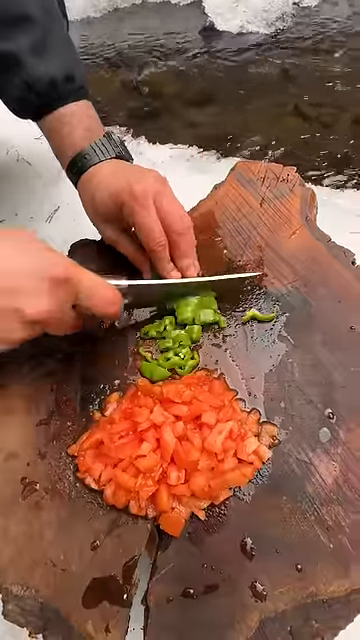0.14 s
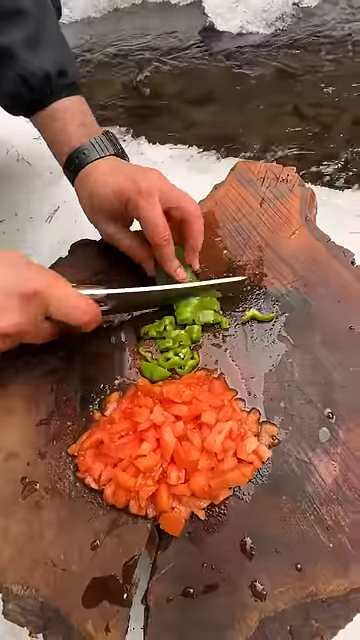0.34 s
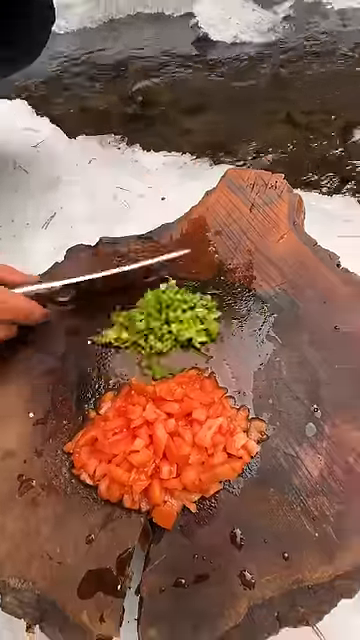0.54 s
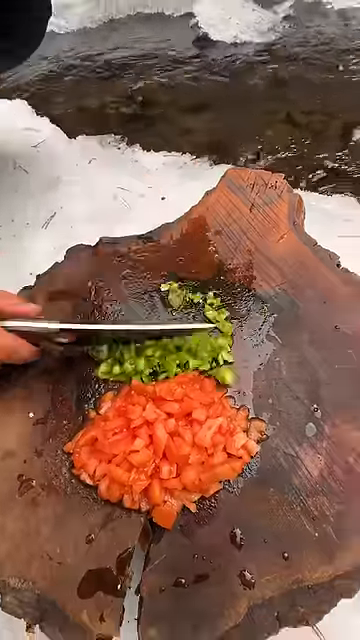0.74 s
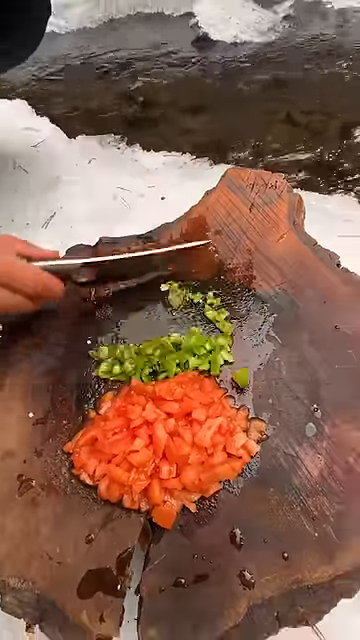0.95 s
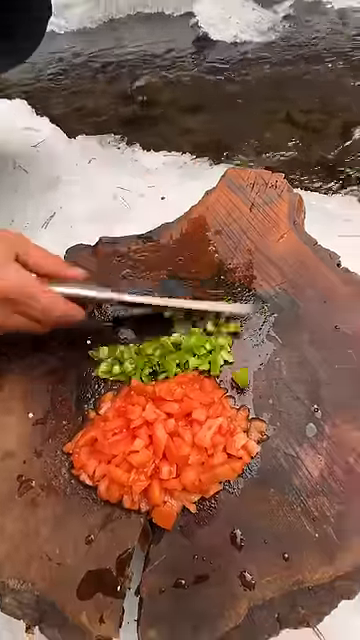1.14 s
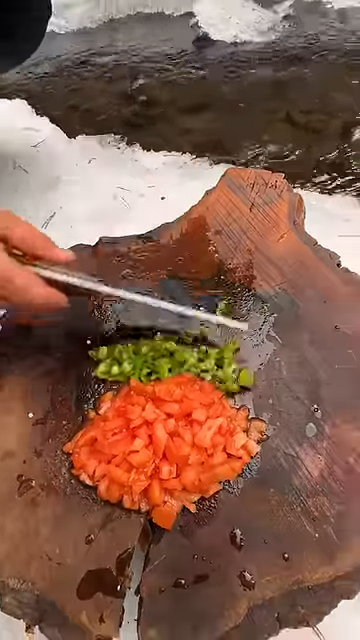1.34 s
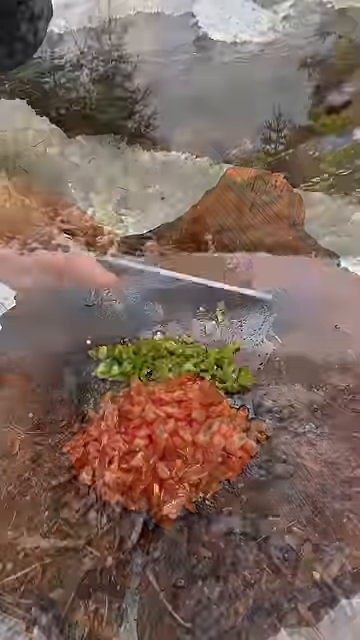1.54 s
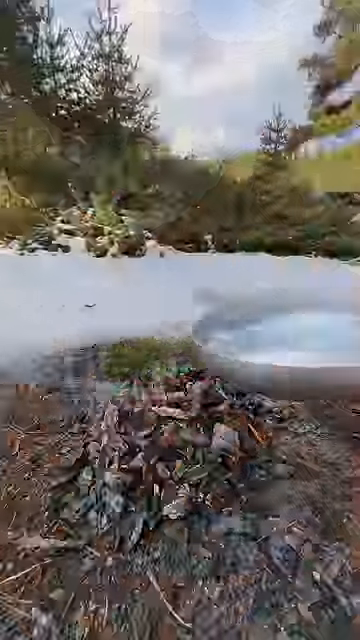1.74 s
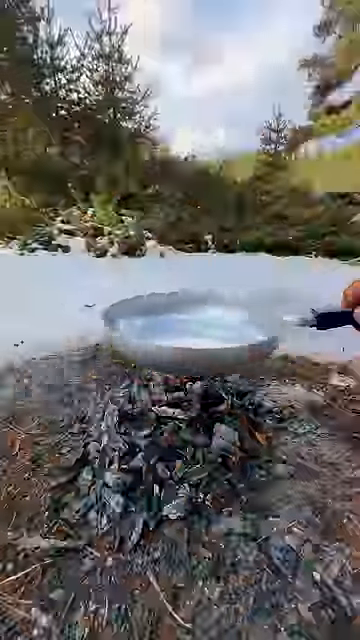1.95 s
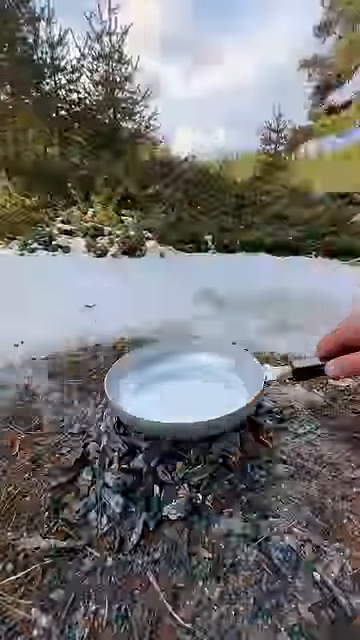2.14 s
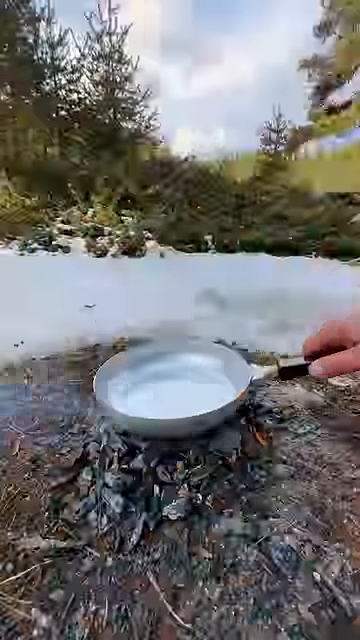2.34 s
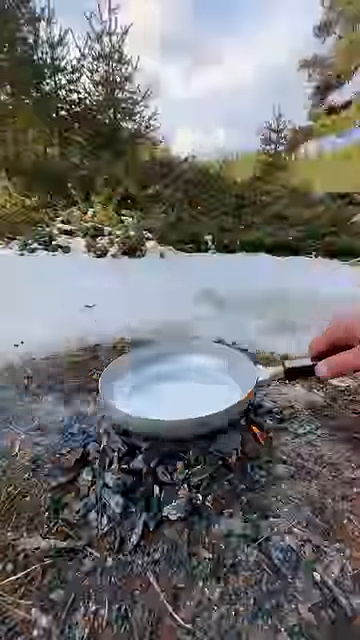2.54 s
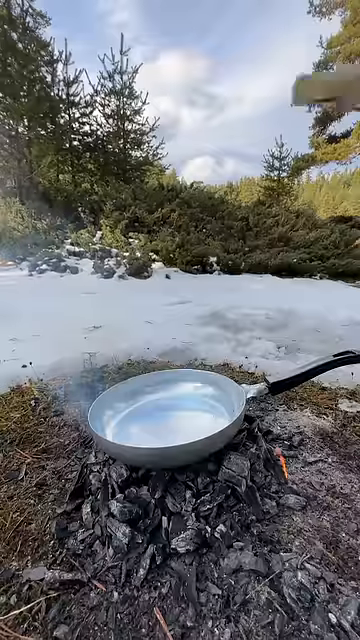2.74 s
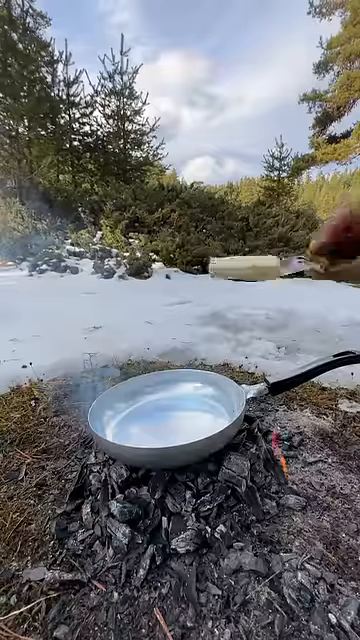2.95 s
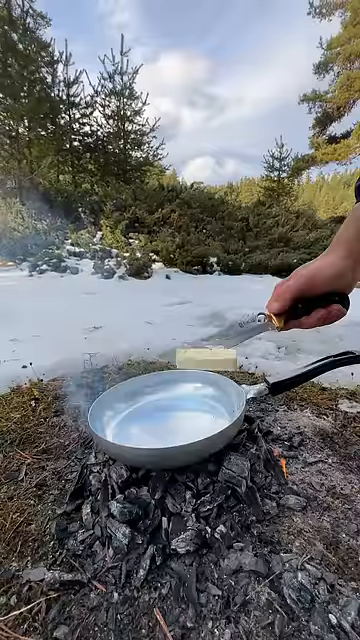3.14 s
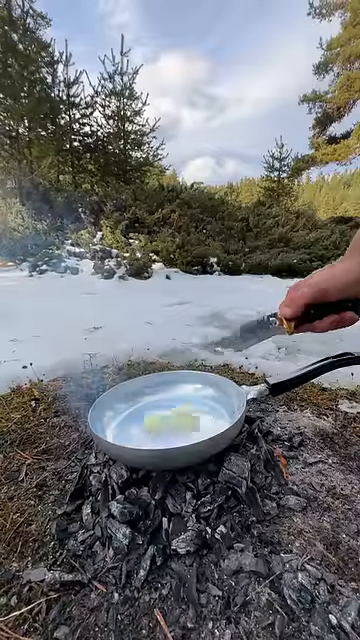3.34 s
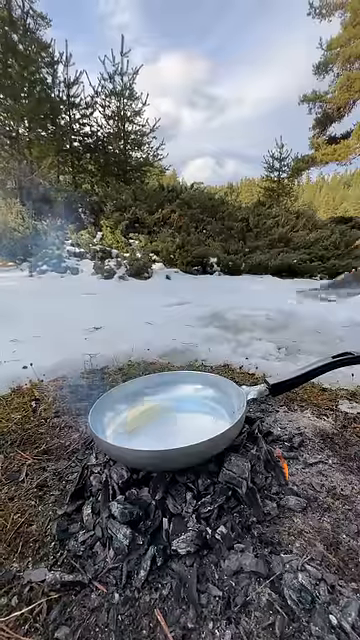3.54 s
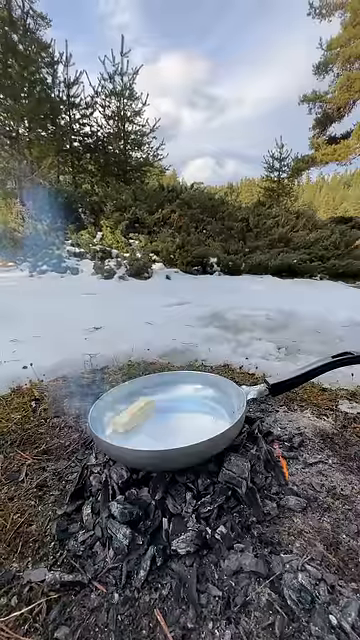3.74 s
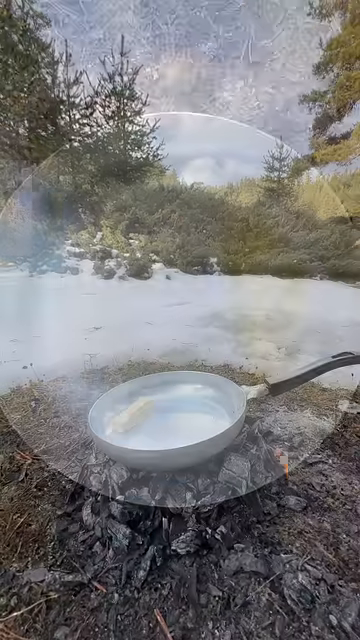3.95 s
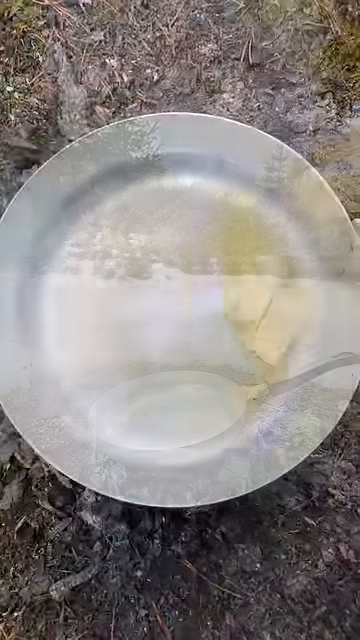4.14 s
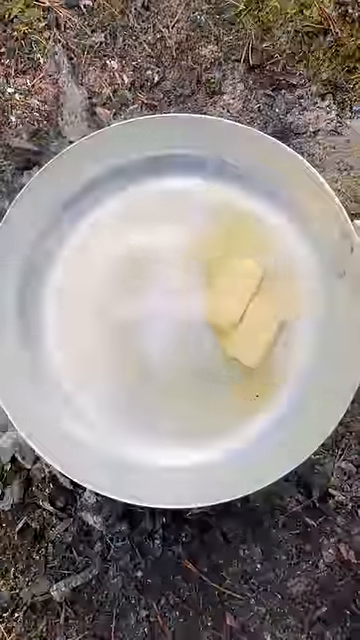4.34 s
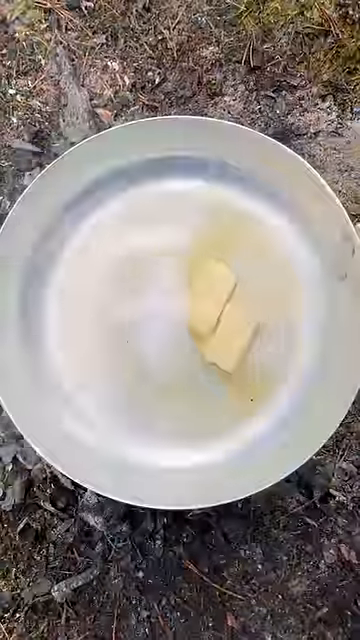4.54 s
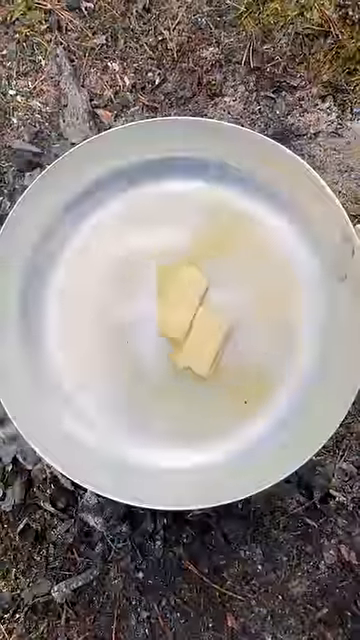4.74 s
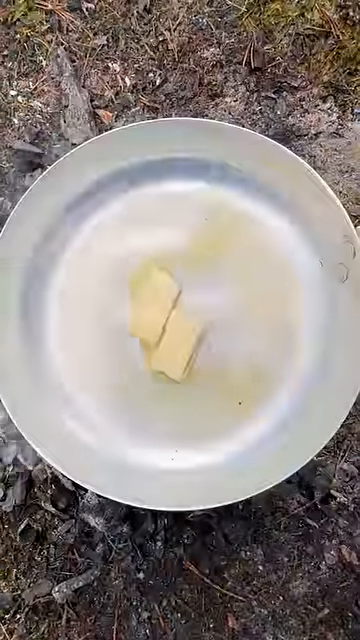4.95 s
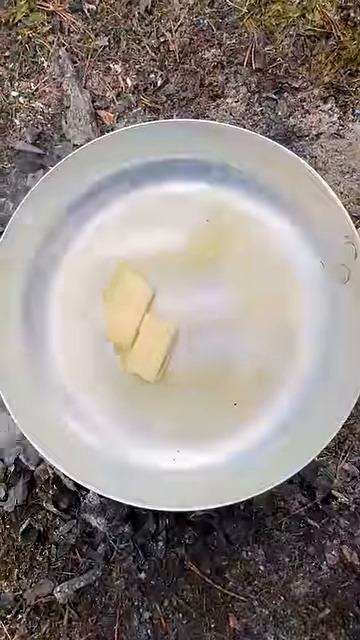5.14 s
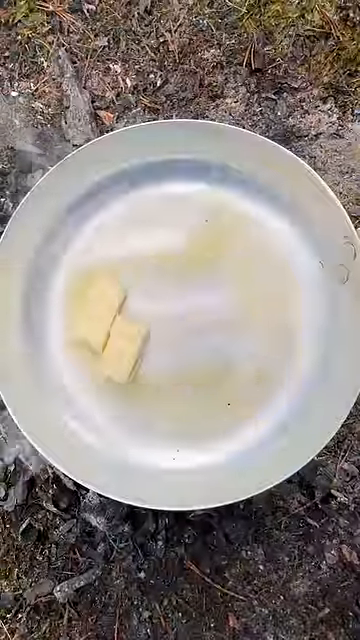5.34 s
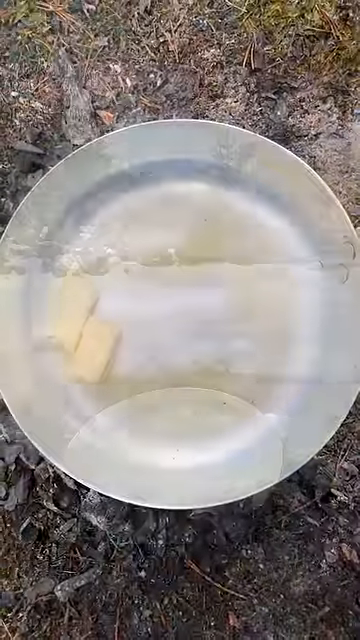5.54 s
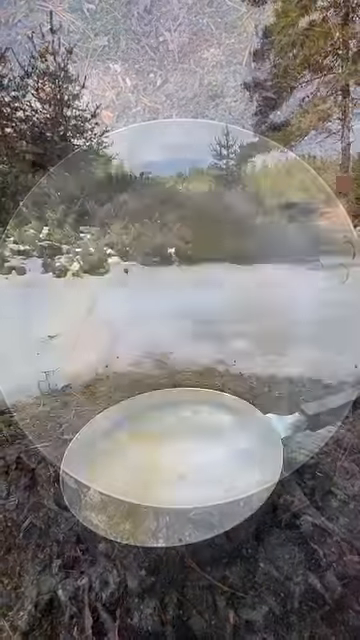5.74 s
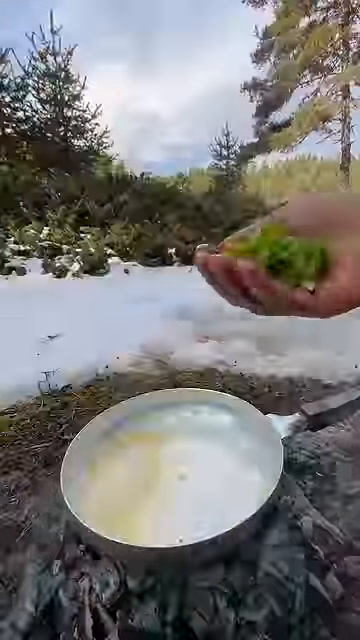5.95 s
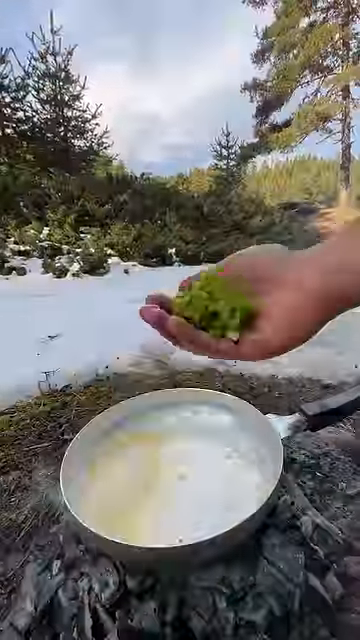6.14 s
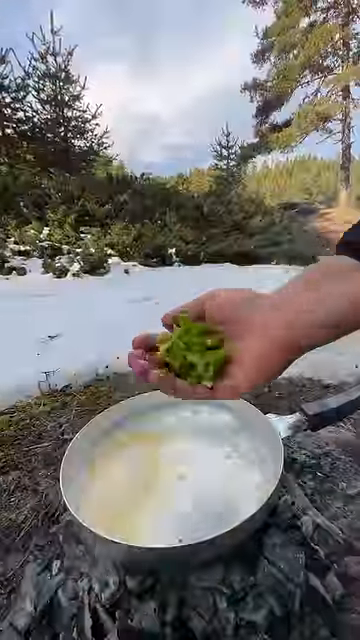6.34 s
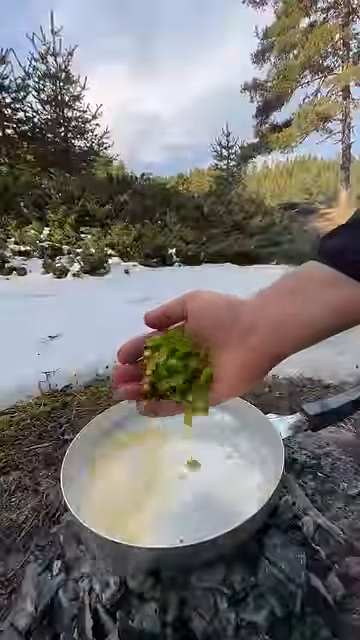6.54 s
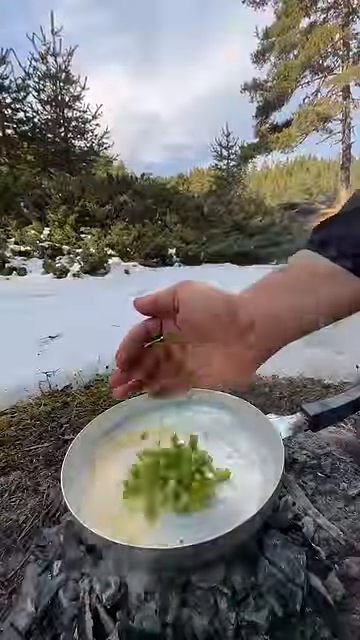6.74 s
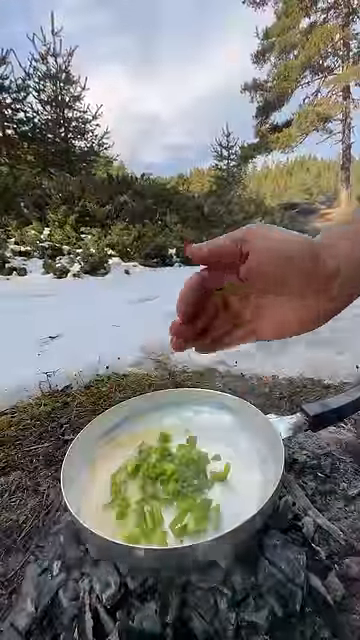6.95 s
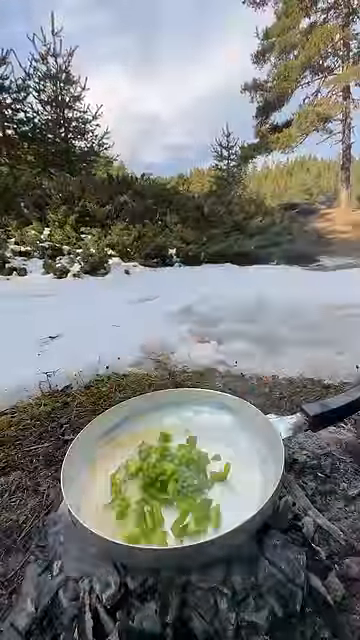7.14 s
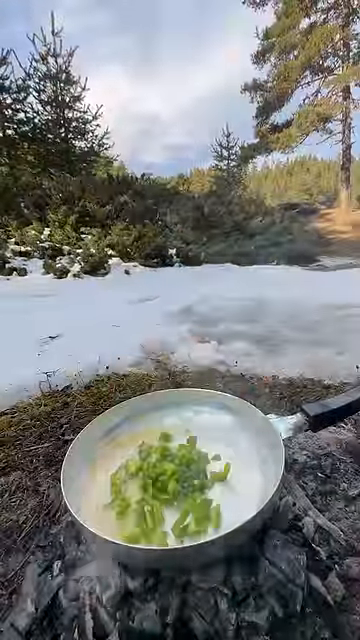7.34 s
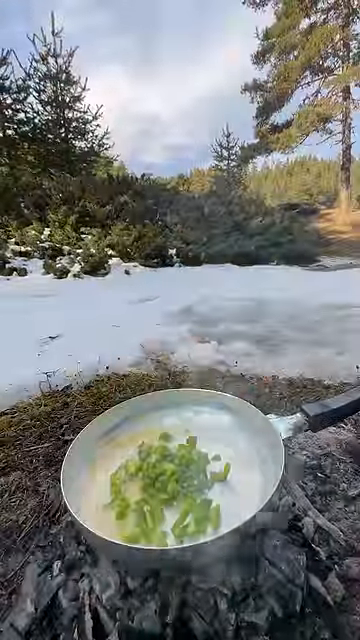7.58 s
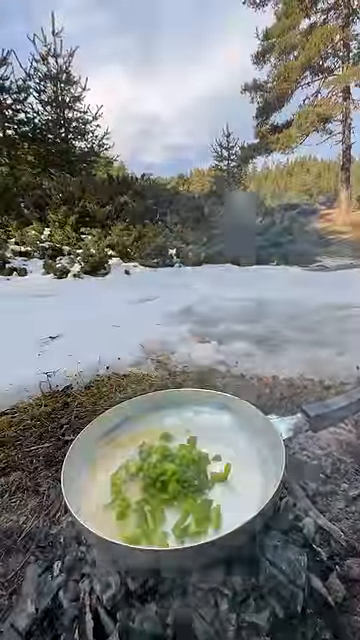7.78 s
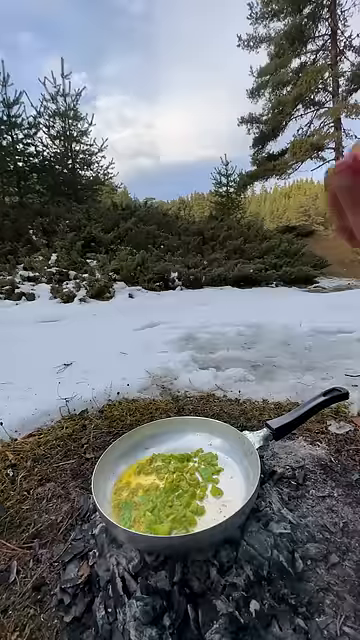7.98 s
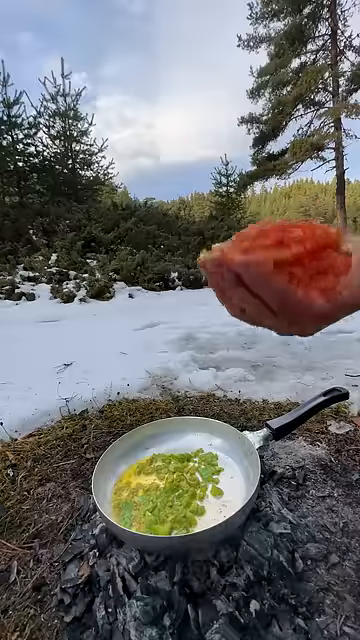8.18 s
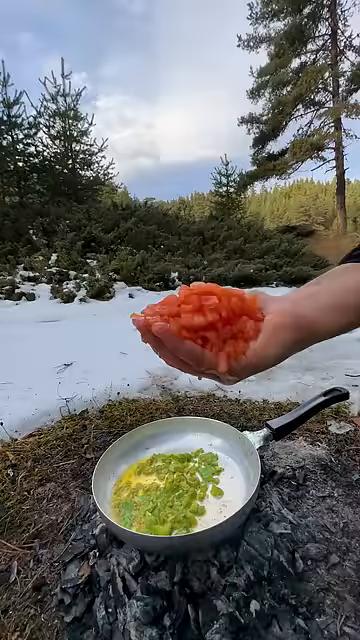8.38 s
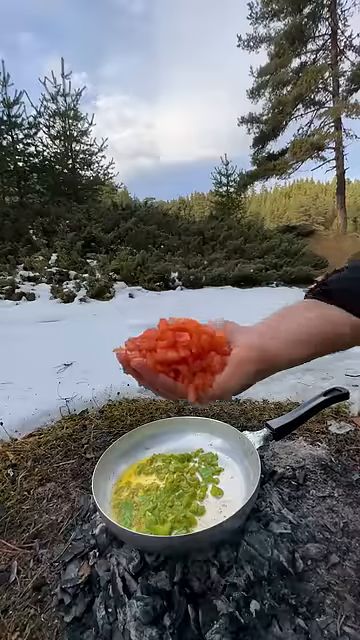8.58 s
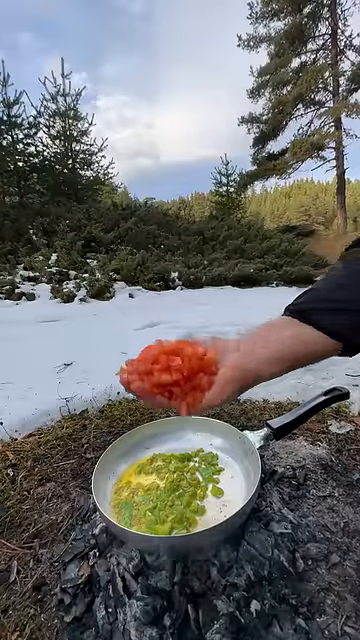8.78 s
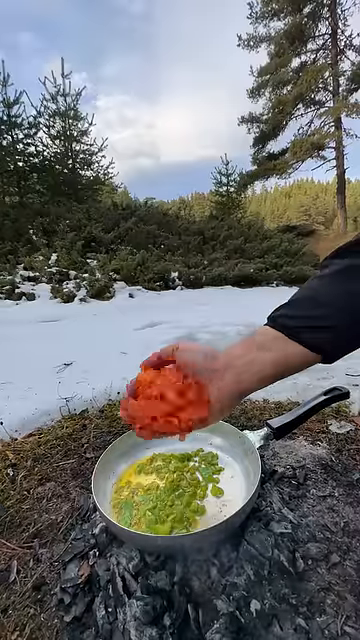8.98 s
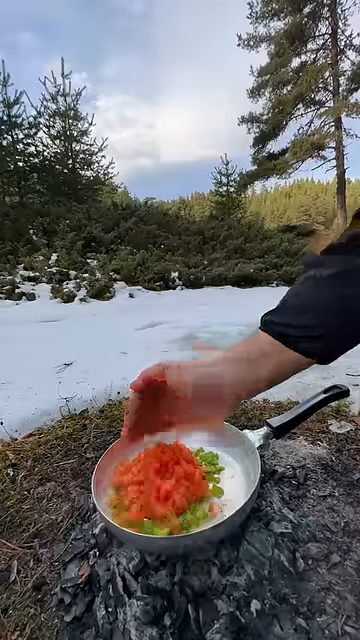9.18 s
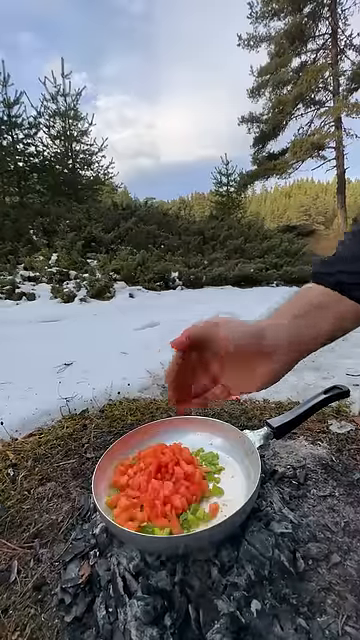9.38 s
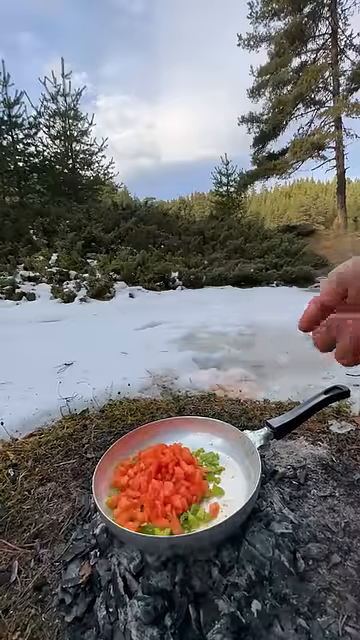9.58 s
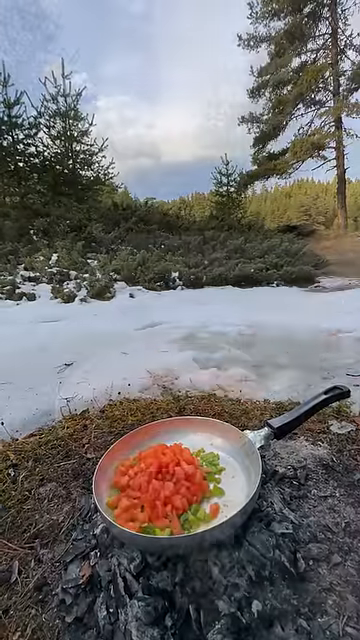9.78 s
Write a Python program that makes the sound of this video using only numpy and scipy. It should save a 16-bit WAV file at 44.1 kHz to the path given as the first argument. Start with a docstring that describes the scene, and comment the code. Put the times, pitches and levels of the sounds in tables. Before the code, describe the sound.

A few sharp, close knife chops on wood come with light scraping. Next a metal pan is set down with a ring and dragged squeakily over embers, then clanks again as butter lands. A quiet stretch holds only faint melting hisses and soft outdoor air. Then chopped pepper hits the hot fat with a loud, bright, crackling sizzle, which suddenly drops to a gentle frying as tomato lands with soft taps.

```python
"""Cooking outdoors by a stream

In short scenes cut together, a knife chops and scrapes on a wet wooden slab. A thin metal pan rings
as it is set on embers and squeals as it is dragged. Butter drops in and melts with a whistling hiss.
Pepper pieces tumble in and fry, loudly and then more quietly, as steam bubbles burst in the fat.
Two microphone openings, close together, pick it up."""
import sys
import numpy as np
from scipy import signal
from scipy.fft import rfft, irfft, next_fast_len
from scipy.io import wavfile

SR = 44100
rng = np.random.default_rng(int(sys.argv[2]) if len(sys.argv) > 2 else 0)


def store_wav(level_fs):
    """Save 16-bit WAV to argv[1]."""
    pcm = np.round(np.clip(np.atleast_2d(level_fs), -1, 1) * 32767)
    wavfile.write(sys.argv[1], SR, pcm.T.astype(np.int16))


N = 432878

# The background of each scene: start_s, rumble_db, murmur_db, hiss_db, murmur_and_hiss_change_db
SCENES = [(0, -72, -52, -57, -7.5), (0.565, -51.5, -56.5, -66.5, 0.5), (1.632, -72.5, -65, -64, 3),
          (2.7, -65.5, -59, -59.5, -9.5), (4.071, -78.5, -64.5, -64, -3.5), (4.22, -76.5, -74, -78, -0.5),
          (5.763, -76.5, -62.5, -60, -3), (6.577, -68.5, -63.5, -67, -12), (7.907, -65.5, -59, -61, -7.5)]
# Tone of the low, middle and high background noise: pitch_hz, level_db
RUMBLE_TONE = [(15, -52), (25, -27), (64, 0), (102, -4.5), (135, -3), (182, -7.5), (300, -12.5),
               (390, -42.5), (660, -120)]
MURMUR_TONE = [(71, -44.5), (120, -19), (296, -3), (406, 0), (634, -2), (787, -5), (916, -6), (2500, -35),
               (3250, -50.5), (5500, -120)]
HISS_TONE = [(590, -39), (1000, -1.5), (1940, 0.5), (2580, -0.5), (4090, -5), (5370, -3), (15000, -9.5),
             (16100, -10.5), (16900, -56)]
# How alike left and right are (1 same, -1 opposite) for background and peel: pitch_hz, likeness
AIR_LIKENESS = [(60, 1), (150, 0.8), (290, 0.77), (640, 0.4), (1400, -0.26), (3100, -0.24), (6800, -0.12),
                (11000, 0.55), (15000, -0.27)]

# Notes of the struck slab (ring_s is the time to fade by 60 dB): pitch_hz, level_db, ring_s
SLAB_NOTES = [(68.6, -16, 0.13), (135, -2.5, 0.024), (522, -6.5, 0.016), (866, 5, 0.014),
              (1192, 1.5, 0.026), (1680, -12, 0.017), (1900, 1.5, 0.011), (2256, 1.5, 0.016),
              (3500, -9, 0.0073), (4990, -21.5, 0.038), (6270, -21, 0.023), (7550, -21, 0.022),
              (9386, -27, 0.023), (10000, -21, .01)]
# The blade hits the slab: start_s, peak_db, treble_tilt_db_per_octave, low_notes_db
CHOPS = [(0.001, -14.5, -9.5, 0), (0.016, -18, -8.5, 3), (0.052, -32, -15, 0), (0.075, -36.5, -3, 0),
         (0.116, -34, -11, -10), (0.134, -29, -11.5, -10), (0.186, -38, -24, -12), (1.006, -41, 2, -8),
         (1.017, -13, -8, 6), (1.026, -22.5, -20, 13), (1.546, -37, 6.5, -4.5), (1.555, -7, -1, -1),
         (1.572, -23.5, -4.5, 9.5), (1.582, -22, -13.5, 10), (1.596, -26, -19, 19), (1.61, -33.5, -17, 1)]
# The blade is drawn through peel and along wood: start_s, length_s, swell_db, peel_db, wood_db, blade_db
STROKES = [(0, 0.036, -28.5, -27, -60, -53), (.03, 0.15, -12, -53.5, -56, -51),
           (.268, 0.15, -4.5, -59.5, -55.5, -71), (.565, 0.078, 1, -55, -47.5, -57.5),
           (1.05, 0.091, 10, -61.5, -53.5, -61), (1.15, 0.04, -9, -49.5, -42, -45),
           (1.575, 0.072, 7, -61, -50, -68)]
# Notes of the scraped wood and of the blade, before rubbing shortens them: pitch_hz, level_db, ring_s
WOOD_NOTES = [(1185, -3, .06), (1680, -3.5, 0.11), (1840, -1, .04), (2150, 1, .015), (2500, -3, 0.03),
              (2780, -12.5, .025), (3500, -13.5, .03)]
BLADE_NOTES = [(4480, -12.5, .04), (5100, -10, .04), (6100, -3, .04), (6260, -2.5, .02), (7500, 0.5, .03),
               (9400, -0.5, .015)]
# Tone of crunching peel: pitch_hz, level_db
PEEL_TONE = [(1760, -33), (3000, 4.5), (3950, -24.5), (4600, -4.5), (8700, -4.5), (9980, -6.5),
             (15200, -24.5), (16200, -5), (16900, -70)]
# Faint bright ticks: start_s, peak_db
TICKS = [(0.078, -25.5), (0.1, -34), (0.675, -36), (0.8076, -48), (4.272, -52), (5.2094, -68),
         (5.3694, -61), (5.5134, -53), (5.5735, -60), (5.75, -59), (5.888, -41)]
# Soft knocks and pops nearby: start_s, peak_db, pitch_hz, thud_db, tick_db
KNOCKS = [(1.837, -37.5, 1170, -55, -34), (1.893, -52, 1500, -80, -58), (1.976, -52, 1470, -81, -43),
          (2.009, -45, 1360, -77, -32), (2.068, -55, 1630, -80, -54), (2.371, -37, 1770, -75, -36),
          (2.488, -34, 1760, -70, -64), (2.659, -38.5, 1760, -68, -50), (2.828, -31, 350, -34, -25),
          (2.923, -58, 445, -46, -57.5), (4.083, -51.5, 547, -82, -38), (4.559, -62, 850, -76, -53),
          (5.498, -65.5, 700, -77.5, -77), (5.765, -50, 301, -66, -66), (5.833, -45, 610, -50.5, -61),
          (5.99, -49, 1250, -71, -64), (6.086, -50, 1200, -76, -46), (6.138, -24, 337, -55, -29.5),
          (6.19, -49, 520, -57, -56), (6.236, -48.5, 600, -61, -60), (6.29, -46, 560, -59, -65),
          (6.394, -53, 800, -66, -59.5), (6.531, -65, 451, -77.5, -45), (8.058, -24, 720, -30.5, -25.5),
          (8.165, -46, 1190, -50, -52), (8.242, -40, 1310, -52, -34), (8.263, -34, 581, -40, -38),
          (8.275, -34.5, 584, -46, -27.5), (9.05, -58, 900, -61, -48), (9.115, -43, 1200, -62, -24),
          (9.124, -35, 786, -46, -24), (9.134, -41.5, 990, -45, -22), (9.146, -38.5, 914, -44, -22),
          (9.176, -49, 1000, -49, -30), (9.219, -51.5, 700, -53, -38), (9.369, -40, 545, -54, -51),
          (9.486, -52, 793, -65, -38)]

# Notes of the pan: early_hit_hz, later_hit_hz, hit_from_below_db, hit_inside_db, ring_s
PAN_NOTES = [(64, 64, -16, -25, 0.14), (220, 220, -24, -29, 0.32), (577, 550, -18, 0, .14),
             (1007, 1001, -2.5, 0, 0.48), (1545, 1523, 1, -7.5, 0.28), (2153, 2120, -1, -11, .1),
             (2261, 2229, -14, -11.5, .25), (2710, 2654, -10.5, -8.5, 0.36), (3130, 3095, 3, -19.5, 0.36),
             (3680, 3591, -14, -11, 0.12), (3950, 3876, -12.5, -11, .1), (4040, 4032, 1, -12, .15),
             (4850, 5300, -17.5, -13.5, .3), (5050, 5700, -8, -17, .4), (6100, 6062, -17, -10.5, 0.36),
             (6380, 19000, -11, -16, 0.39), (6918, 6826, -8, -9.5, 0.09), (7500, 3500, -12.5, -15.5, .16),
             (7660, 7833, -4.5, -10, .1), (8430, 8419, -6.5, -6, .14), (9180, 11000, 4, -5.5, 0.12),
             (9680, 8800, -4, -12, .15), (10200, 13000, -7.5, -10, 0.089), (11500, 8900, -3.5, -18, .07)]
# Hits on the pan: start_s, peak_db, inside_share, treble_tilt_db_per_octave, free_s, left_over_right_db
PAN_HITS = [(2.124, -29.5, 0.34, -2.5, 0.0067, -1), (2.131, -7, 0.56, -1.5, 0.0029, -1),
            (2.136, -5, 0.25, -5.5, 0.002, -1), (2.14, -17, 0, 4, .19, 0.5),
            (2.217, -25.5, 0, 6.5, 0.0061, -3), (2.371, -25, 0, 23, 0.0075, 1),
            (2.488, -38.5, 0.6, -4.5, 0.013, -7), (2.662, -35.5, 0.26, 4.5, 0.0039, 4),
            (3.239, -20, 0.8, -5.5, 0.014, 0.5), (3.247, -9.5, 1, -1.5, 0.052, -1),
            (3.249, -2.5, 0.8, -4.5, .0015, 4), (3.304, -25, .9, -7, 0.0025, 13),
            (3.311, -19, 0.56, -8, 0.0073, 2.5), (6.586, -30, 0.65, -1.5, 0.011, -3),
            (6.635, -25.5, 1, -9, 0.0056, -10), (6.722, -29, 0.54, -5, 0.0018, 1)]
# The pan is pushed over the embers: start_s, length_s, swell_db, grating_db, overtones_db
DRAGS = [(2.14, 0.056, -10.5, -34.5, -57), (2.215, 0.091, -6.5, -44, -39.5), (2.32, 0.071, -5.5, -45, -71),
         (2.445, 0.22, -9, -47.5, -57)]
# The path of the pan's squeal: time_s, pitch_hz, relative_level_db
SQUEAL_PATH = [(2.216, 4050, -50), (2.224, 4050, -20), (2.229, 4090, -42), (2.234, 4190, -32),
               (2.245, 4170, -34), (2.256, 3900, -38), (2.268, 4110, -35), (2.285, 3930, -40),
               (2.303, 4100, -43), (2.312, 4110, -48)]
# Pan notes woken by the squeal and the drag, before rubbing shortens them: pitch_hz, level_db, ring_s
SQUEAL_NOTES = [(4100, -3, .06), (3990, -4, 0.071)]
DRAG_OVERTONES = [(7650, 0, .06), (6490, -8, 0.11), (9850, -7.5, .06), (10600, -6.5, .06)]

# Butter meets hot metal: start_s, length_s, swell_db, hiss_db, bubbling_db
MELTS = [(4.08, 0.1, -5, -55, -52.5), (4.53, 0.05, 0, -71.5, -66.5), (5.19, .05, 0, -81, -77),
         (5.49, 0.036, -2.5, -74, -71), (5.63, 0.059, 4, -73, -70.5)]
# Notes of the butter's whistle and of its bubbling: pitch_hz, level_db, ring_s
WHISTLE_NOTES = [(6650, 5.5, .035), (6450, -5.5, 0.013), (7550, -9.5, 0.016), (9030, -12, 0.0083),
                 (6000, -13.5, 0.012)]
BUBBLE_NOTES = [(660, -2.5, .02), (840, 0.5, .02), (950, -2.5, 0.017), (1260, -13, 0.0098),
                (2450, -7, 0.023)]
# Loudness of the frying fat, one curve for each frying scene: time_s, sizzle_db, sputter_db
FRY_LEVELS = [
    [(6.582, -43.5, -49), (6.69, -34, -56), (6.745, -24.5, -51.5), (7.05, -25.5, -44), (7.55, -28.5, -44.5),
     (7.898, -25.5, -44.5), (7.906, -58, -94)],
    [(7.907, -55.5, -65), (9.2, -50, -69), (9.816, -49, -60)],
]
# Tone of the bright sizzle and of the lower sputter: pitch_hz, level_db
SIZZLE_TONE = [(1800, -14.5), (2500, -14.5), (4000, -9), (5500, -11.5), (7000, 1.5), (9500, -2),
               (11000, -1.5), (13000, -6.5), (16000, -6)]
SPUTTER_TONE = [(210, -68), (350, 10), (389, -29.5), (510, 1), (908, 8), (1680, 9), (2340, -14.5),
                (3500, -29), (4550, -31.5), (7700, -120)]
# How alike left and right are for the frying: pitch_hz, likeness
FRY_LIKENESS = [(60, .98), (130, .7), (290, -.35), (500, -.7), (950, .1), (1400, .87), (1900, .86),
                (3100, .6), (5000, .7), (8000, .88), (15000, .88)]
# The loudest bursts of fat: start_s, peak_db, pitch_hz
FAT_POPS = [(6.807, -13, 8100), (6.816, -15.5, 7000), (6.8352, -11.5, 9250), (6.8574, -6.5, 9050),
            (6.9188, -13.5, 7100), (6.999, -13, 6000), (7.0464, -14, 6850), (7.0906, -16.5, 6580),
            (7.1844, -11.5, 5800), (7.274, -14, 8300), (7.3537, -9, 9160), (7.3673, -9.5, 9350),
            (7.429, -7, 7340), (7.4847, -21, 1680), (7.5263, -8.5, 8500), (7.6242, -18.5, 7040),
            (7.7983, -8, 8900), (7.866, -12.5, 9600)]
# The treble range that sounds hollow: low_hz, high_hz
HOLLOW_HZ = [11700, 14000]

BAND_EDGES_HZ = 28 * 2 ** (np.arange(29) / 3)   # three bands to an octave
FILLED_PITCH = .89   # fat and food lower the pan's notes by this factor
TIME_S = np.arange(N) / SR


def amp(db):
    """Turn decibels into a number to multiply a sound by."""
    return 10 ** (np.asarray(db) / 20)


def low_cut(sound, hz):
    """Take away the sound below a pitch."""
    return signal.sosfilt(signal.butter(2, hz, "high", fs=SR, output="sos"), sound)


def at_hz(points, hz, outside=None):
    """Read a table at any pitch, joining its points with straight lines across the octaves."""
    pitches, values = np.transpose(points)
    return np.interp(np.log(hz), np.log(pitches), values, outside, outside)


def in_time(tables):
    """Join timed rows into one curve per column; outside the tables the value is -120 (silence)."""
    curves = np.full((len(tables[0][0]) - 1, N), -120.)
    for rows in tables:
        times, *columns = np.transpose(rows)
        inside = (TIME_S >= times[0] - .001) & (TIME_S <= times[-1] + .001)
        curves[:, inside] = [np.interp(TIME_S[inside], times, column) for column in columns]
    return curves


def movement_db(rows, column, fade_db_per_s):
    """Loudness of separate movements: each starts quickly, grows or sinks, then dies away."""
    loudest = np.full(N, -120.)
    for start, length, swell_db, *levels in rows:
        age = TIME_S - start
        db = levels[column] + swell_db * np.minimum(age / length, 1)
        db -= fade_db_per_s * np.maximum(age - length, 0)
        db += 20 * np.log10(np.clip(age / .0037, 1e-4, 1))   # a quick fade in
        loudest = np.maximum(loudest, np.where(age >= 0, db, -120))
    return loudest


def drift(rate_hz):
    """A smooth random wander, about 1 in size."""
    hold = np.exp(-128 * np.pi * rate_hz / SR)
    slow = signal.lfilter([1], [1, -2 * hold, hold * hold], rng.standard_normal(N // 64 + 1002))[1000:]
    return np.interp(np.arange(N) / 64, np.arange(len(slow)), slow / slow.std())


def grains(per_s, spread_db):
    """Random clicks of uneven size, as two pairs of signals."""
    chance = np.clip(per_s / SR, 1e-4, 1)
    sizes = amp(spread_db * np.minimum(rng.exponential(1, (2, 1, N)), 3))
    clicks = sizes * (rng.random((2, 1, N)) < chance)
    return clicks / np.sqrt(np.mean(clicks ** 2)) * rng.standard_normal((2, 2, N)) + 1e-18


def shape_noise(source, layers, likeness, flicker_db):
    """Shape noise band by band into stereo; each layer is a tone table and a loudness curve."""
    out, shared_drift = np.zeros((2, N)), drift(1)
    centres, widths = np.sqrt(BAND_EDGES_HZ[1:] * BAND_EDGES_HZ[:-1]), np.diff(BAND_EDGES_HZ)
    powers = [amp(at_hz(tone, centres, -99.)) ** 2 * widths for tone, db in layers]
    levels = np.array([amp(db) ** 2 for tone, db in layers])
    for k, hz in enumerate(centres):
        shares = np.array([power[k] / power.sum() for power in powers])
        if shares.max() < 1e-6:
            continue
        band = signal.butter(2, BAND_EDGES_HZ[k:k + 2], "band", fs=SR, output="sos")
        mid, side = signal.sosfilt(band, source[k % 2]) * np.sqrt(SR / 2 / widths[k])
        gain = np.sqrt(shares @ levels) * amp(flicker_db * (.17 * shared_drift + drift(10)))
        alike = np.clip(at_hz(likeness, hz), -.98, .98)
        out += gain * np.sqrt(.5) * (np.sqrt(1 + alike) * mid + np.sqrt(1 - alike) * side * [[1], [-1]])
    return out


def ring(push, hz, ring_s):
    """Each push sets one fading note ringing."""
    hold, step = amp(-60 / (ring_s * SR)), 2 * np.pi * hz / SR
    return signal.lfilter([0, np.sin(step)], [1, -2 * hold * np.cos(step), hold * hold], push + 1e-18)


def add(out, start_s, sound, peak_db, left_db):
    """Place a sound at its time and level; left_db is how much louder it is on the left."""
    first = round(start_s * SR)
    sound = sound[:N - first] * amp(peak_db) / np.abs(sound).max()
    out[:, first:first + len(sound)] += sound * amp([[left_db / 2], [-left_db / 2]])


def strike(hz, db, ring_s, free_s, crack_db, tail_s):
    """A hit: notes ring freely for free_s and are then muffled, over a crack and a noisy rattle."""
    t = np.arange(round(.4 * SR)) / SR
    hz, db, ring_s = hz[:, None], db[:, None], ring_s[:, None]
    detune, offset = rng.normal(0, 1, (2, len(hz), 1))
    phase = 2 * np.pi * hz * t
    twins = .25 * np.sin(phase * (1 + .006 * detune) + 2 * offset)   # a close twin makes a note throb
    notes = amp(db - 60 * t / ring_s) * (np.sin(phase) + twins)
    mute = amp(-1500 * np.maximum(t - free_s, 0))
    touch = np.where(hz < 2500, mute, mute ** .3)   # a touch muffles low notes most
    swell = np.minimum(t / (.00076 + .76 / hz), 1)   # low notes swell later
    body = (notes * touch * swell).sum(0)
    noise = low_cut(signal.lfilter([1], [1, -.7], rng.standard_normal(len(t))), 600)
    crack, rattle = amp(-21 - 60 * t / .0022), mute * amp(-24.5 - 60 * t / tail_s)
    return body / np.abs(body).max() + noise * amp(crack_db) * (crack + rattle)


def rubbed(push, notes, ring_share=1):
    """Steady pushing keeps a set of notes sounding; ring_share shortens their ring."""
    rung = sum(amp(db) / np.sqrt(ring_s * ring_share * SR / 27.6) * ring(push, hz, ring_s * ring_share)
               for hz, db, ring_s in notes)
    return low_cut(rung, 600) / np.sqrt(np.sum(amp(np.array(notes)[:, 1]) ** 2))


def pop(hz, fade_s):
    """A tiny burst of noise, strongest around one pitch."""
    t = np.arange(round(.02 * SR)) / SR
    burst = rng.standard_normal(len(t)) * amp(-60 * t / fade_s)
    return low_cut(ring(burst, hz, 6 / hz) + .098 * burst, .44 * hz)


def surroundings():
    """Stream, embers and breeze: smooth noise that jumps at each new scene; the rumble comes in gusts."""
    start, rumble_db, murmur_db, hiss_db, change_db = np.transpose(SCENES)
    now = np.searchsorted(start, TIME_S, "right") - 1
    lengths = np.diff(np.append(start, N / SR))
    fade_db = change_db[now] * (TIME_S - start[now]) / lengths[now]
    layers = [(RUMBLE_TONE, rumble_db[now] + 1.1 * drift(rate_hz=1.8)),
              (MURMUR_TONE, murmur_db[now] + fade_db), (HISS_TONE, hiss_db[now] + fade_db)]
    return shape_noise(rng.standard_normal((2, 2, N)), layers, AIR_LIKENESS, flicker_db=3.5)


def knife():
    """Chops ring the slab, the edge sticks and slips over the grain, and the peel crunches."""
    board, (hz, db, ring_s) = np.zeros((2, N)), np.transpose(SLAB_NOTES)
    for start, peak_db, tilt_db, low_db in CHOPS:
        colour_db = np.where(hz < 300, low_db, tilt_db * np.log2(hz / 1000))
        chop = strike(hz, db + colour_db, ring_s, free_s=.1, crack_db=-20, tail_s=.15)
        add(board, start, chop, peak_db, left_db=-.8)
    # The edge leaves the wood at once, but the peel rustles on.
    peel_db = movement_db(STROKES, column=0, fade_db_per_s=154)
    wood_db, blade_db = (movement_db(STROKES, column, fade_db_per_s=1200) for column in (1, 2))
    slip_hz = 140 * amp(2.5 * drift(20))
    slips = np.maximum(np.sin(2 * np.pi * np.cumsum(slip_hz) / SR), 0) ** 3
    stutter = (.5 + 1.74 * slips) * rng.standard_normal(N)
    scrape = low_cut(rubbed(amp(wood_db) * stutter, WOOD_NOTES, ring_share=.5), 1000)
    scrape += rubbed(amp(blade_db) * stutter, BLADE_NOTES, ring_share=.9)
    waver_s = .0004 * drift(6.5)   # the notes waver as the touching point moves
    board += np.interp(TIME_S + waver_s, TIME_S, scrape)
    end = round(SCENES[2][0] * SR)   # the knife stops dead where the third scene starts
    board[:, end:], peel_db[end:] = 0, -120
    crackle = grains(6900, spread_db=3) * (1.1 + slips)
    return board, shape_noise(crackle, [(PEEL_TONE, peel_db)], AIR_LIKENESS, flicker_db=.3)


def ticks():
    """Faint, bright ticks here and there."""
    out = np.zeros((2, N))
    for start, peak_db in TICKS:
        add(out, start, pop(9500, fade_s=.014), peak_db, left_db=-2)
    return out


def knocks():
    """Soft knocks: a dull burst of noise over a low thud, with a bright tick at the front."""
    out, t = np.zeros((2, N)), np.arange(round(.15 * SR)) / SR
    for start, peak_db, hz, thud_db, tick_db in KNOCKS:
        noise = rng.standard_normal((2, len(t)))
        push = noise[0] * np.minimum(t / .003, 1) * amp(-60 * t / .057)
        body = ring(push, hz, 3.1 / hz) + .33 * ring(push, 1240, .0061)
        thud = np.sin(2 * np.pi * 150 * t) * amp(-60 * t / .037)
        tick = noise[1] * np.minimum(t / .0023, 1) * amp(-60 * t / .042)
        add(out, start, low_cut(low_cut(body, .48 * hz), .48 * hz), peak_db, left_db=-4)
        add(out, start + .0059, thud, thud_db, left_db=-4)
        add(out, start, low_cut(tick, 7000), tick_db, left_db=-4)
    return out


def pan_hits():
    """Hits from below or inside ring the pan; later hits ring on a partly different set of notes."""
    out = np.zeros((2, N))
    early_hit_hz, later_hit_hz, below_db, inside_db, ring_s = np.transpose(PAN_NOTES)
    octaves = np.log2(np.maximum(early_hit_hz, 550) / 2000)
    for start, peak_db, inside, tilt_db, free_s, left_db in PAN_HITS:
        db = below_db + inside * (inside_db - below_db) + tilt_db * octaves
        hz = early_hit_hz if start < 3 else later_hit_hz * (FILLED_PITCH if start > 6 else 1)
        crack_db = 3.5 * (1 - inside)   # hard embers crack more than soft food
        add(out, start, strike(hz, db, ring_s, free_s, crack_db, tail_s=.16), peak_db, left_db)
    return out


def pan_drag():
    """Embers grate under the sliding pan and set it ringing, and it squeals on a wavering pitch."""
    out, span = np.zeros((2, N)), slice(round(2.1 * SR), round(2.9 * SR))
    hz, _, below_db, _, ring_s = np.transpose(PAN_NOTES)
    notes = list(zip(hz, below_db + 1.9 * np.log2(hz / 2000), ring_s))[2:]   # all but the lowest two
    grit = grains(5500, spread_db=-17)[0]
    grating, singing = (amp(movement_db(DRAGS, k, fade_db_per_s=594)) * grit[k] for k in (0, 1))
    squeal_hz, squeal_db = in_time([SQUEAL_PATH])
    loudness = amp(squeal_db + 2.4 * drift(49.3))
    wavering_hz = squeal_hz * (1 + .0039 * drift(60))
    squeal = (loudness * np.sin(2 * np.pi * np.cumsum(wavering_hz) / SR))[span]
    singing *= amp(4 * drift(30))
    out[:, span] += 1.5 * squeal + amp(-18) * rubbed(squeal, SQUEAL_NOTES, ring_share=.95)
    out[:, span] += rubbed(grating[span], notes, ring_share=.72) + amp(-7) * low_cut(grating[span], 1200)
    out[:, span] += low_cut(rubbed(singing[span], DRAG_OVERTONES, ring_share=.99), 5000)
    return out


def melting_butter():
    """Butter meets hot metal with a thin whistling hiss and a low bubbling."""
    hiss, bubbling = (amp(movement_db(MELTS, column, fade_db_per_s=295)) for column in (0, 1))
    whistle = rubbed(hiss * grains(4000, spread_db=5.5)[0], WHISTLE_NOTES)
    return whistle + rubbed(bubbling * grains(500, spread_db=0)[0], BUBBLE_NOTES)


def frying(spits_per_s=160):
    """Steam bubbles burst in the fat: a bright crackle, a lower sputter and single spits of all sizes."""
    sizzle_db, sputter_db = in_time(FRY_LEVELS)
    clicks = np.abs(grains(1500, spread_db=0)[:, :1])
    bursts = signal.lfilter([.2], [1, -.93], clicks)   # each lasts about a millisecond
    crackle = (1 + bursts) * rng.standard_normal((2, 2, N))
    layers = [(SIZZLE_TONE, sizzle_db), (SPUTTER_TONE, sputter_db)]
    out = shape_noise(crackle / crackle.std(), layers, FRY_LIKENESS, flicker_db=1.65)
    for start, peak_db, hz in FAT_POPS:
        add(out, start, pop(hz, fade_s=.012), peak_db, left_db=-1.5)
    first_s, last_s = FRY_LEVELS[0][0][0], FRY_LEVELS[-1][-1][0] - .03
    for when, strength, pitch, side in rng.random((round(spits_per_s * (last_s - first_s)), 4)):
        start, hz = first_s + when * (last_s - first_s), 1200 * 8 ** pitch
        pitch_db = 5 * np.log2(hz / 8000)   # large bubbles are lower and weaker
        peak_db = sizzle_db[round(start * SR)] - 3 + 9 * strength + pitch_db
        add(out, start, pop(hz, fade_s=.00085 + 6 / hz), peak_db, left_db=8 * (side - .5))
    return out


def tumbling_pepper(pieces=36, start_s=6.65, length_s=.11):
    """A handful of pepper pieces lands in a soft patter, each one briefly ringing the pan."""
    out = np.zeros((2, N))
    early_hit_hz, later_hit_hz, _, inside_db, ring_s = np.transpose(PAN_NOTES)
    dull_db = inside_db - 7.2 * np.log2(np.maximum(early_hit_hz, 550) / 2000)
    for when, softness in rng.random((pieces, 2)):
        db = dull_db + rng.normal(0, 2.7, len(dull_db))
        hz = FILLED_PITCH * later_hit_hz * rng.normal(1, .026, len(db))
        landing = strike(hz, db, ring_s, free_s=.0057, crack_db=0, tail_s=.16)
        add(out, start_s + length_s * when, landing, peak_db=-41 - 4 * when - 3.2 * softness, left_db=-4)
    return out


def microphone_lag(sound, opposite_hz=13000):
    """Near sounds reach one opening just before the other; the lag grows with pitch."""
    size = next_fast_len(N)
    hz = np.arange(size // 2 + 1) * SR / size
    phase = np.pi / 2 * (hz / opposite_hz) ** 1.7 * np.array([[-1], [1]])
    return irfft(rfft(sound, size) * np.exp(1j * phase), size)[:, :N]


def scene():
    """Mix the cooking sounds with their surroundings."""
    board, peel = knife()
    near = board + ticks() + knocks() + pan_hits() + pan_drag() + frying() + tumbling_pepper()
    return microphone_lag(near) + peel + melting_butter() + surroundings()


def record(dry):
    """Hollow out the high treble in what left and right share, then cut off the very top."""
    mid, side = (dry[0] + dry[1]) / 2, (dry[0] - dry[1]) / 2
    hollow = signal.cheby2(4, 25, HOLLOW_HZ, "stop", fs=SR, output="sos")
    top_cut = signal.ellip(10, .3, 70, 15900, fs=SR, output="sos")
    mid = signal.sosfiltfilt(hollow, mid)
    return signal.sosfilt(top_cut, [mid + side, mid - side])


dry = scene()
out = record(dry)
store_wav(out)
```